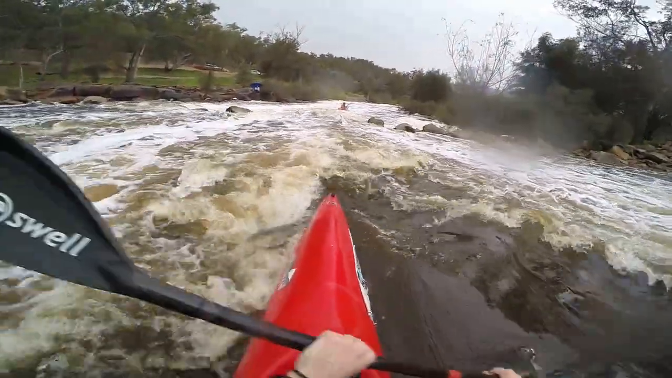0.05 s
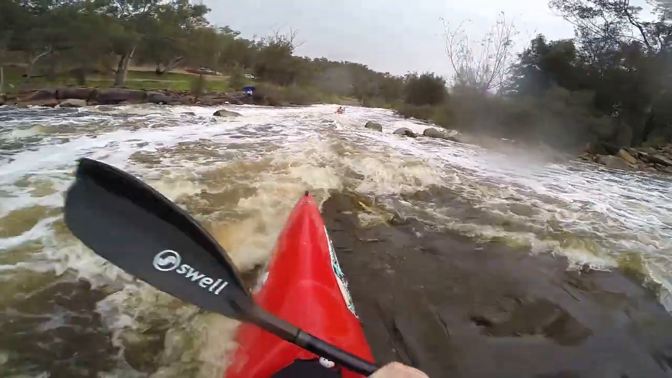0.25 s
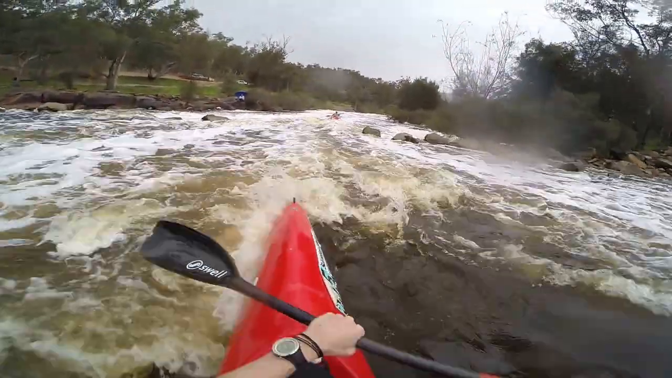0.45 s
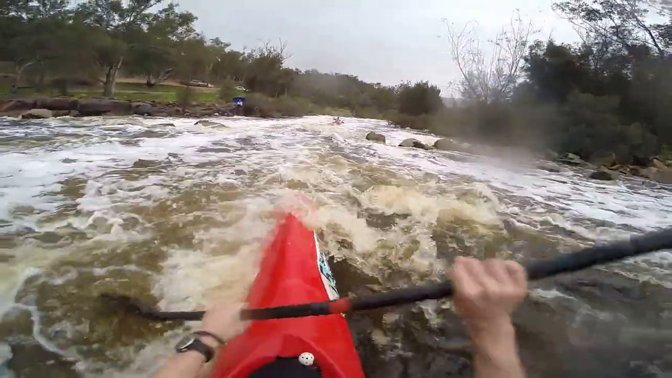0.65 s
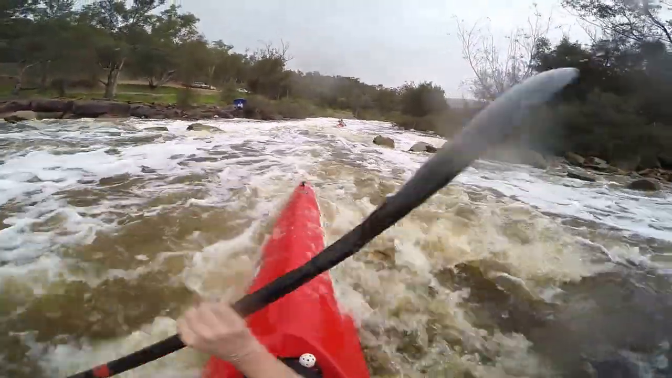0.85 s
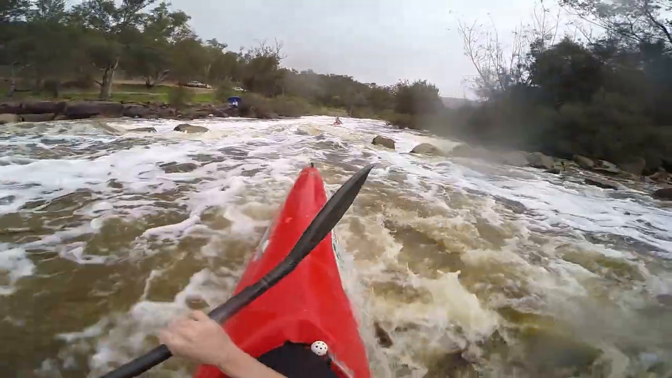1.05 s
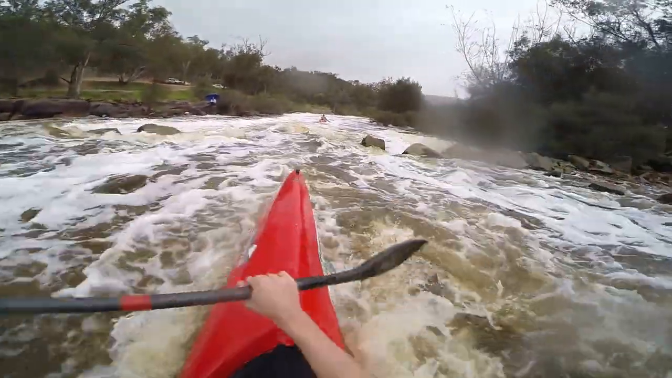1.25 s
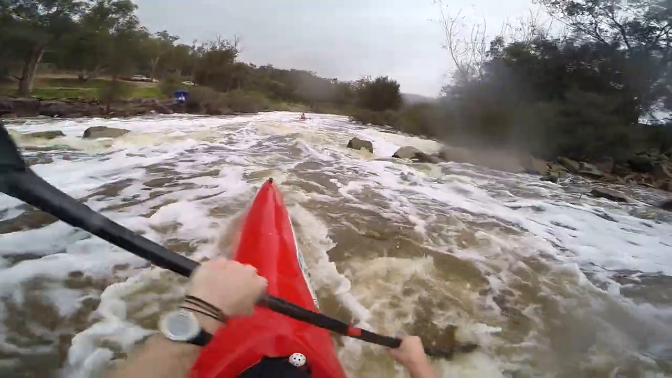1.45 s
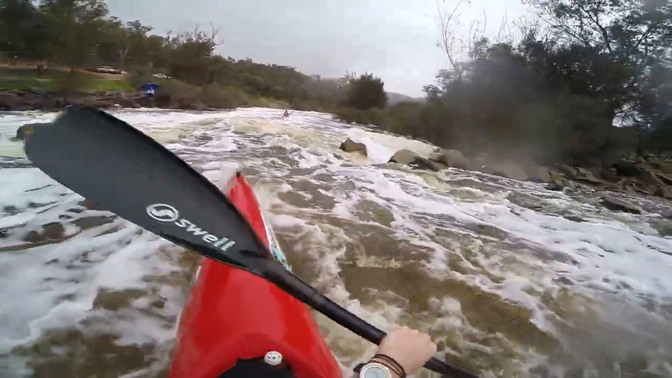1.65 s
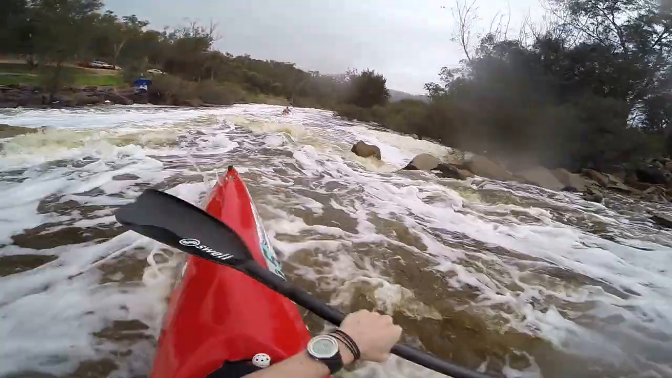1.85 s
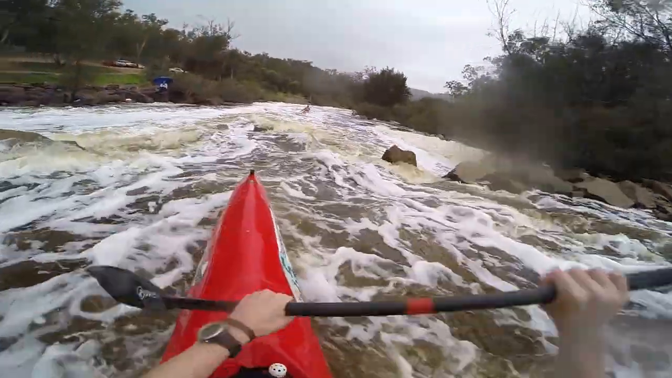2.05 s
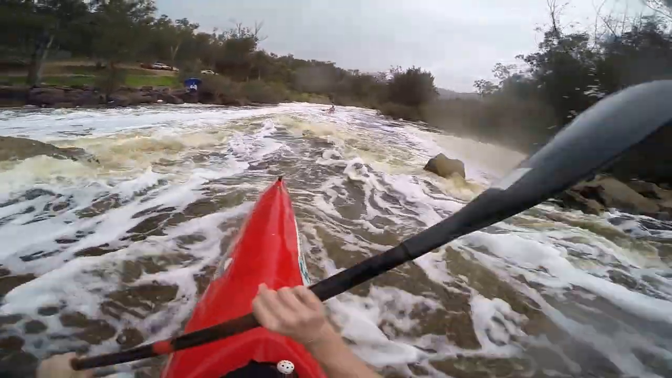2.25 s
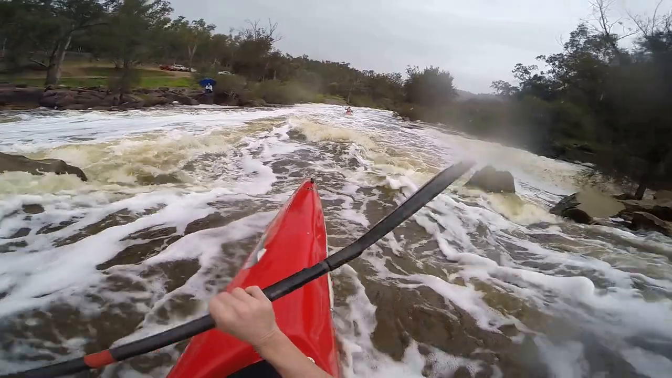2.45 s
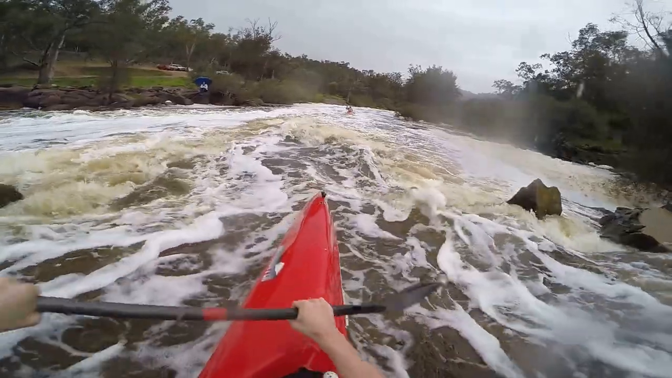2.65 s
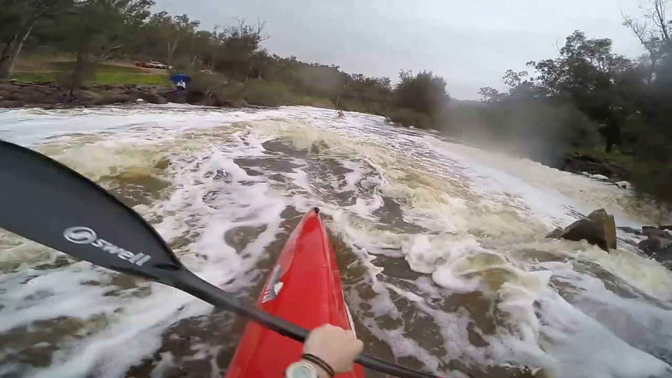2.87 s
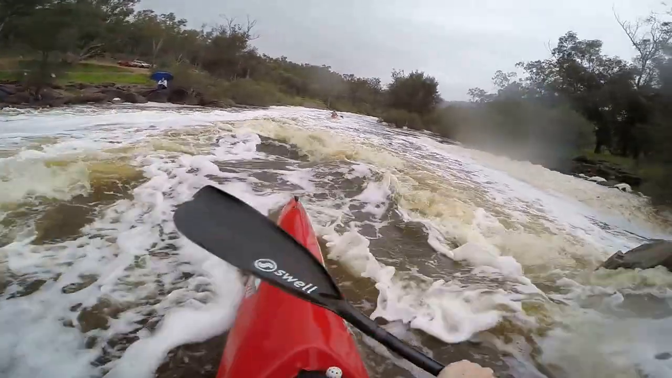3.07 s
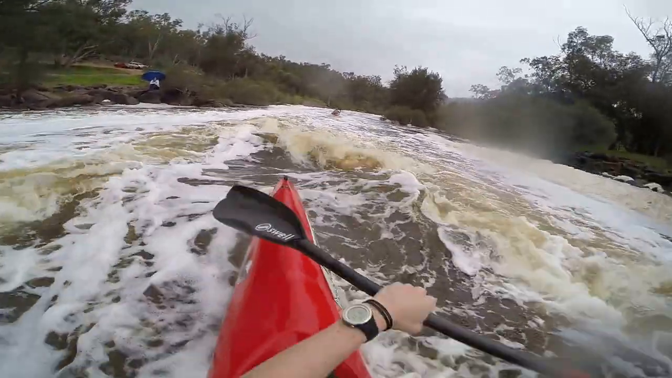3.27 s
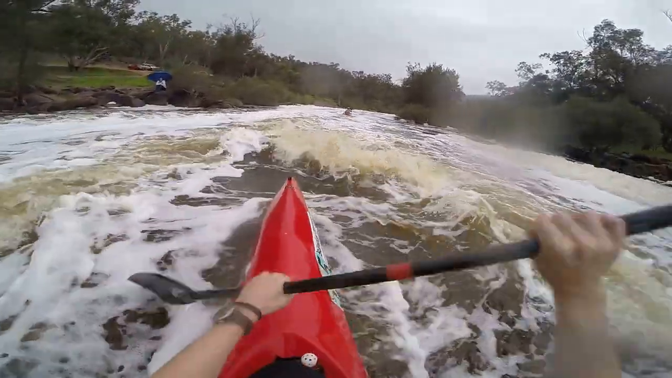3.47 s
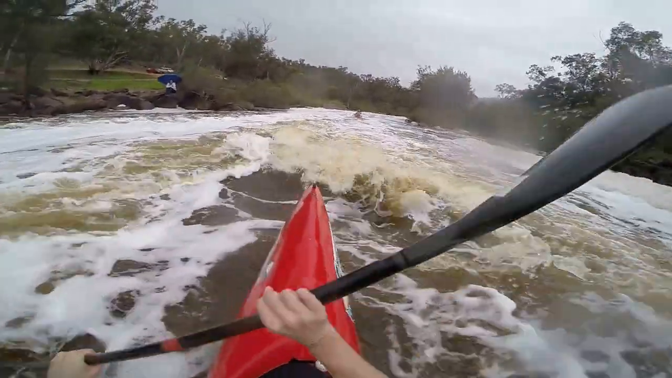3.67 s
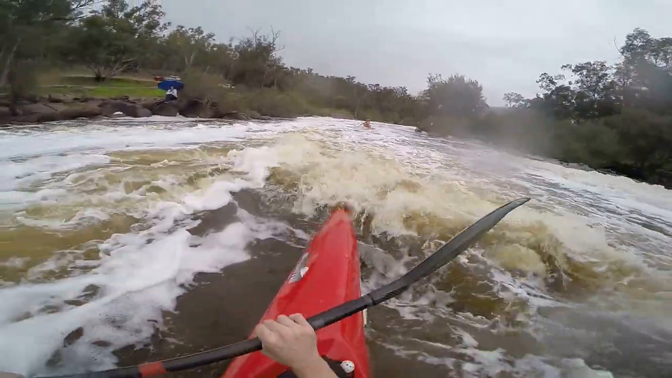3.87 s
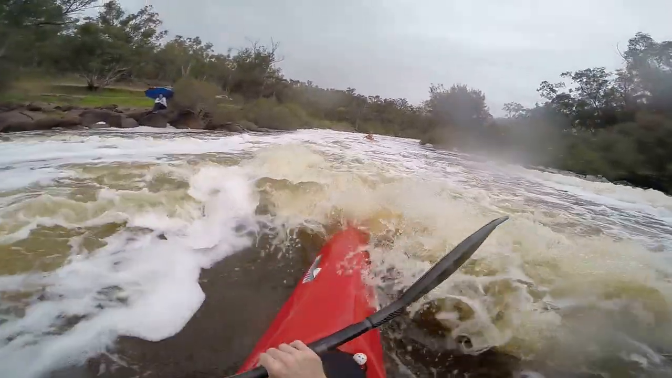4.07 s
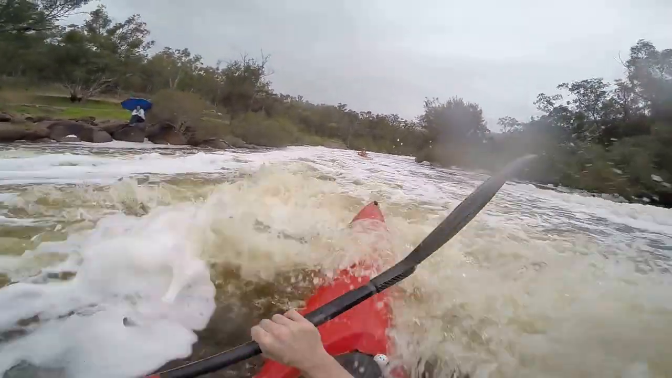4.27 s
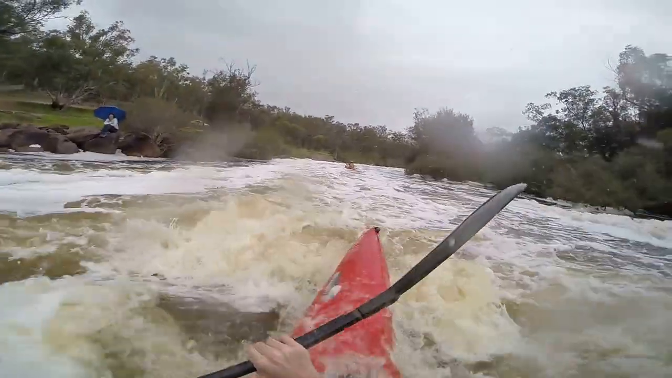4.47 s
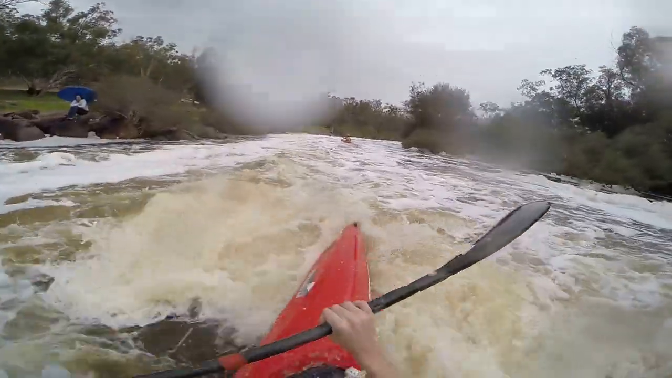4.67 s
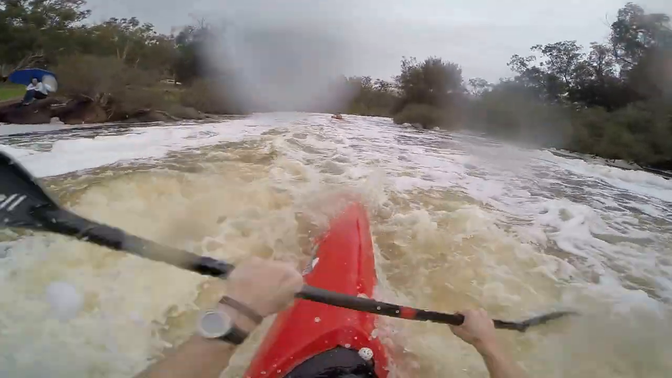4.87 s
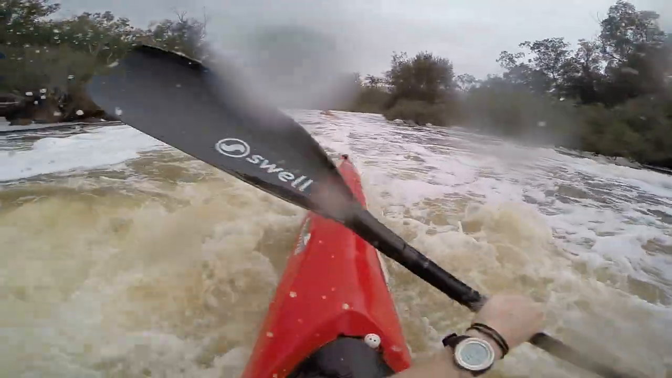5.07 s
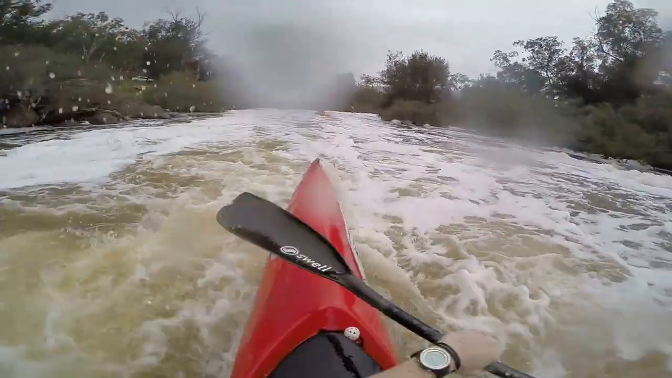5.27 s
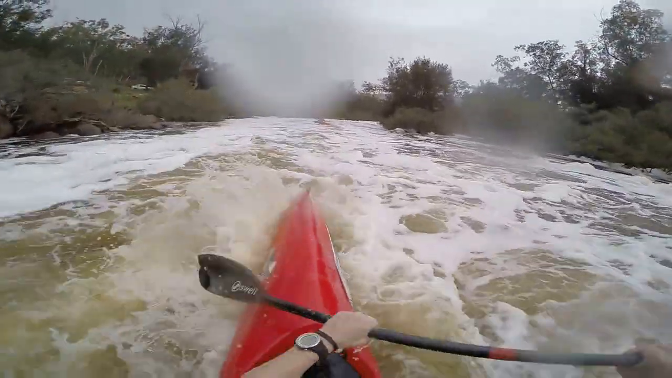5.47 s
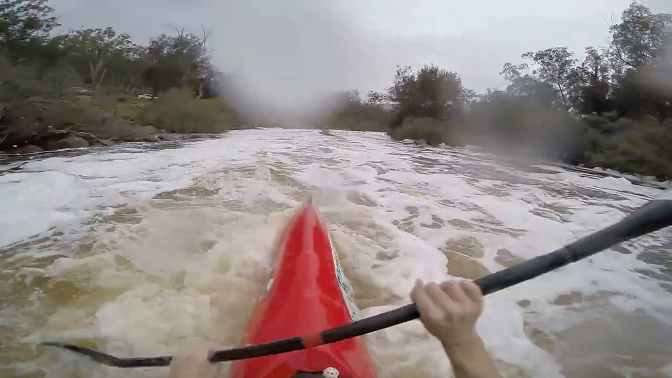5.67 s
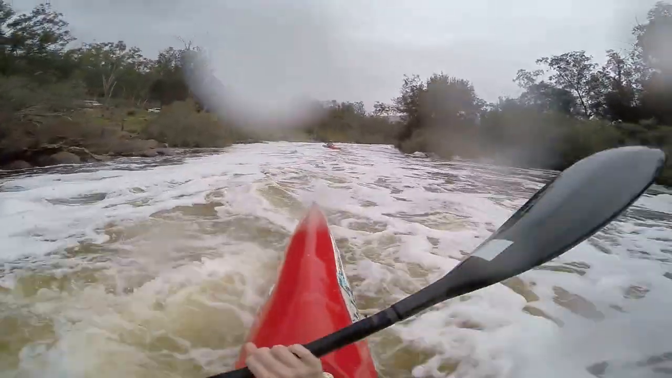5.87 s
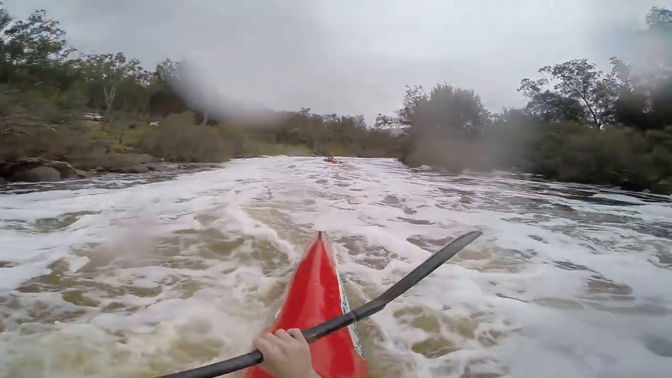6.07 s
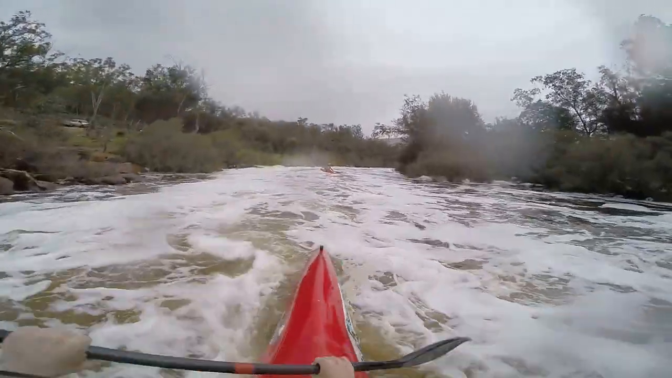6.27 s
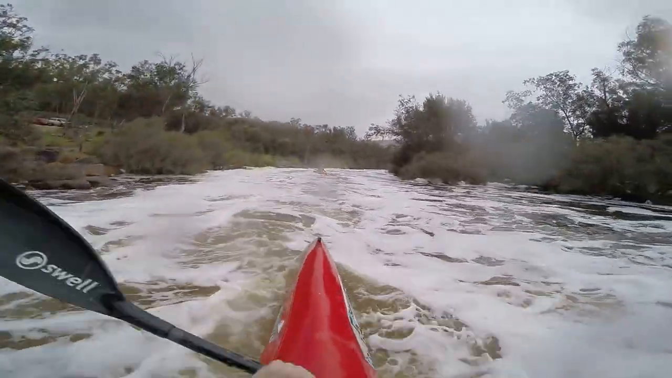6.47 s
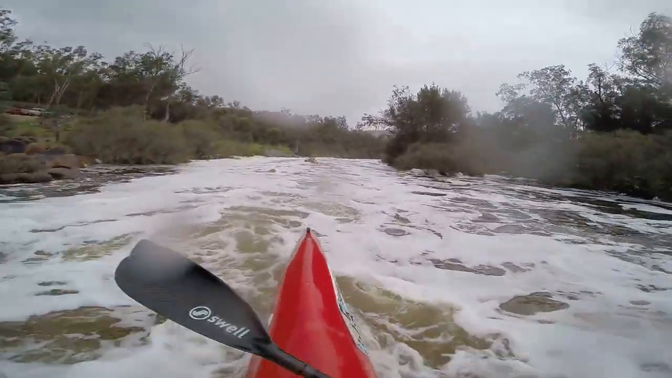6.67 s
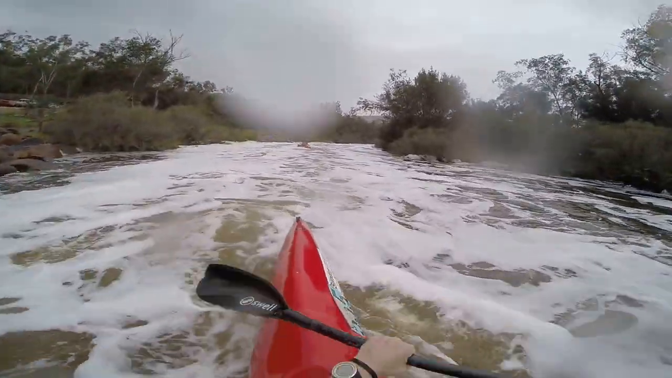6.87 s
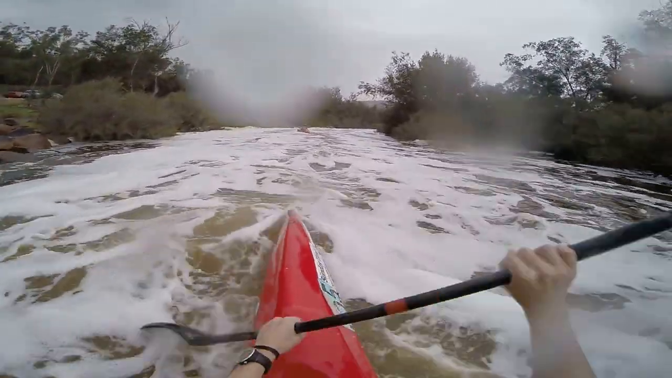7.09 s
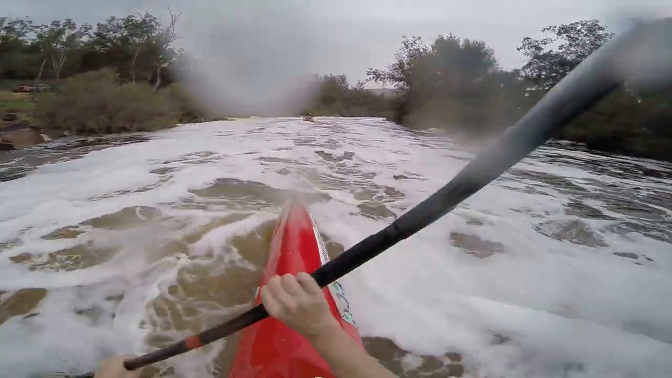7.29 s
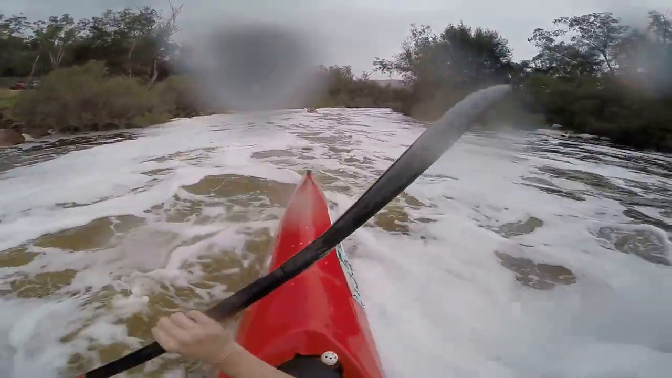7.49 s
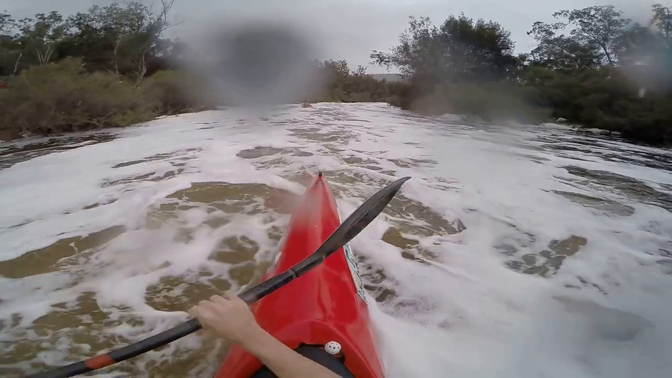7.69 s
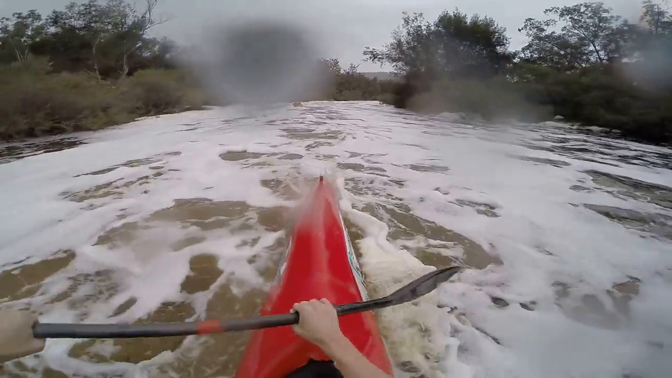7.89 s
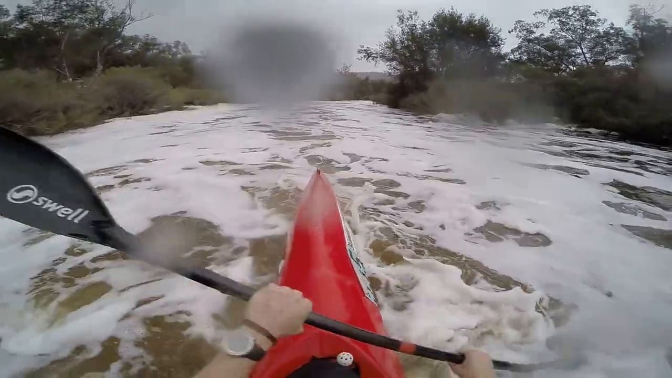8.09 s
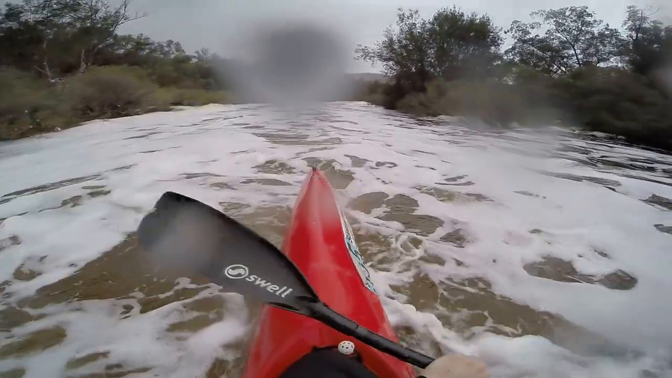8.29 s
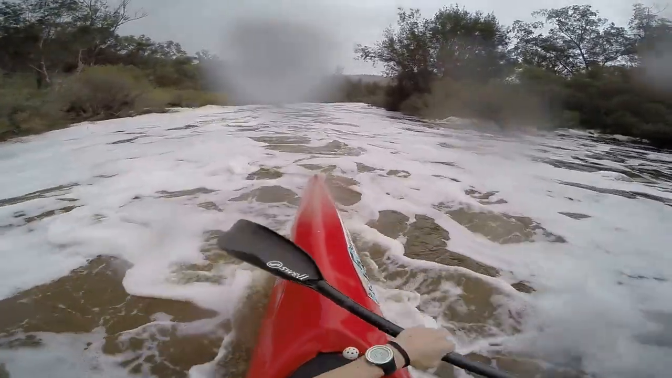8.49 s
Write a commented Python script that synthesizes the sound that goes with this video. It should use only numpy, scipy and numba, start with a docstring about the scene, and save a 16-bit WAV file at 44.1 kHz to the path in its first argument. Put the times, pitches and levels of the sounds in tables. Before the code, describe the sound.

Heard from a paddler's body through a hollow, resonant waterproof case, a kayak drops through whitewater. From 0 s the water is loud and rough, a dense bubbling rush with hissing spray; a slap of splash and a low buffet come near 0.75 s, and smaller splashes with a paddle swish around 1.5 s. It eases by 2.1 s, then low roar and gusts build from 2.8 s, with two ticks at 3.25 s. Splashes from 4.1 s lead to the loudest burst at 4.4-4.7 s: crashing water, fine patter and hard drop taps. Around 5.0-5.4 s come a strong swish, spray, two sharp clicks and deep hull gulps. From 5.6 s the rush falls away, with a clear tap at 6.4 s, soft blade swishes around 6.6 and 7.3 s, a tiny wet squeak at 7.5 s, faint ticks, and quiet foam until a final tap at 8.5 s.

```python
"""On a whitewater rapid a kayak runs the waves, heard by a microphone in a waterproof case worn by the paddler.
Clouds of ringing bubbles over a noise wash make the churn, splash, spray and paddle swish, all through the case.
Low noise buffets and roars, sagging sines gulp and thump the hull, and a narrow band of noise squeaks.
Flung drops tap the case and ring its walls; finer droplets patter as a cloud of very short rings."""
import sys
import numpy as np
from scipy import signal
from scipy.fft import rfft, irfft, next_fast_len
from scipy.io import wavfile
from numba import njit

SR = 44100
rng = np.random.default_rng(int(sys.argv[2]) if len(sys.argv) > 2 else 0)


def int16_out(signal):
    """Quantize to a 16-bit WAV file."""
    q = np.round(np.clip(np.atleast_2d(signal).T, -1, 1) * 32767)
    wavfile.write(sys.argv[1], SR, q.astype(np.int16))


N = 376613
TIME = np.arange(N) / SR


def undb(db):
    """Decibels to gain."""
    return 10 ** (np.asarray(db) / 20)


def unit(x):
    """Scale to rms 1."""
    return x / np.sqrt(np.mean(x ** 2))


def walk(rate):
    """Random levels, `rate` a second, joined by straight lines; spread near 1."""
    knots = rng.standard_normal(4096)
    line = np.interp(TIME * rate, np.arange(len(knots)), knots)
    return line * np.sqrt(3 / 2)  # makes up for the spread lost between knots


def colour(x, points):
    """Filter a sound along a spectrum curve, straight between its points on a log frequency axis."""
    size = next_fast_len(len(x))
    hz, db = np.transpose(points)
    bin_hz = np.arange(size // 2 + 1) * SR / size
    gain = undb(np.interp(np.log(bin_hz + 1), np.log(hz), db))
    return irfft(rfft(x, size) * gain, size)[:len(x)]


def add(out, s, sound):
    """Mix a sound in at time s."""
    start = int(s * SR)
    out[start:start + len(sound)] += sound[:max(N - start, 0)]


def swells(table, skew=1):
    """Half-sine gain for each (t/s, length/s, level/dB) row; a skew under 1 rises faster than it dies."""
    out = np.zeros(N)
    for s, length, db in table:
        age = np.linspace(0, 1, int(length * SR))
        add(out, s, undb(db) * np.sin(np.pi * age ** skew))
    return out


def with_turbulence(db, growth):
    """Gain of a layer: db in usual water, plus `growth` dB for each dB the water gets rougher."""
    # how hard the water breaks around the boat, through two drops and out into the foam below:
    # [t/s, roughness/dB]
    roughness = [(0.0, -38), (1.0, -37.5), (1.47, -40.5), (1.62, -42), (2.09, -46.5), (2.95, -43.5),
                 (3.3, -40.5), (4.52, -36.5), (5.28, -39), (5.56, -44.5), (5.94, -47), (6.23, -51),
                 (7.02, -55), (7.54, -52), (7.8, -56), (8.54, -57)]
    usual_db = -44
    s, rough_db = np.transpose(roughness)
    return undb(db + growth * (np.interp(TIME, s, rough_db) - usual_db))


def case_response(size=2048):
    """Minimum-phase impulse response of the case: its wall and air resonances as bumps in the spectrum."""
    # resonances and one dip of the waterproof case: [centre f/Hz, width at half the dB height/Hz, level/dB]
    resonances = [(708, 116, 3), (1267, 130, 2.5), (1651, 610, 7), (2538, 690, 10.5), (2980, 125, -4.5),
                  (3377, 110, 4), (4700, 310, 4), (5775, 240, 5), (6900, 890, 2.5), (10420, 400, 3),
                  (12380, 1000, 3)]
    hz = np.arange(size // 2 + 1) * SR / size
    db = sum(peak * .5 ** ((2 * (hz - centre) / width) ** 2) for centre, width, peak in resonances)
    # folding the cepstrum onto positive time makes the response causal
    cepstrum = irfft(np.log(undb(db)))
    cepstrum[1:size // 2] *= 2
    cepstrum[size // 2 + 1:] = 0
    return irfft(np.exp(rfft(cepstrum)))


def in_case(x):
    """A sound as it arrives inside the case, hollowed by the resonances."""
    return signal.oaconvolve(x, case_response())[:len(x)]


@njit
def ring_bubbles(starts, hz, cycles, sizes, rise):
    """Each bubble is a fading sine whose pitch rises as it nears the surface."""
    out = np.zeros(N)
    for k in range(len(starts)):
        length = int(cycles[k] * SR / hz[k]) + 2
        z = sizes[k] + 0j
        step = np.exp(2j * np.pi * hz[k] / SR - 6 / length)  # turns the phase and fades
        glide = np.exp(2j * np.pi * hz[k] / SR * rise / length)  # speeds the turning
        for i in range(starts[k], min(N, starts[k] + length)):
            out[i] += z.imag
            z *= step
            step *= glide
    return out


def bubbles(low_hz, high_hz, cycles, spread_db, count):
    """A cloud of bubbles at random times and pitches, most faint and a few close; `cycles` is a mean life."""
    when, pitch, life, size = rng.random((count, 4)).T
    starts = (when * N).astype(np.int64)
    hz = low_hz * (high_hz / low_hz) ** pitch
    nearness = -np.log(1 - size * .995)
    sizes = undb(spread_db * nearness) * hz  # small ones are brief, so they peak higher for the same hiss
    return unit(ring_bubbles(starts, hz, cycles * (.5 + life), sizes, 0.18))


def whitewater(cloud, spectrum, wash_db, flicker_db, flicker_rate):
    """Near bubbles over the smooth noise wash of countless far ones, tumbling unevenly."""
    water = cloud + undb(wash_db) * rng.standard_normal(N)
    cased = in_case(colour(water, spectrum))
    return unit(cased * undb(flicker_db * walk(flicker_rate)))


def buffeting():
    """Eddies press on the case in breeze and gusts, over the river's low roar that swells at the big wave."""
    # relative spectra of the eddies and of the roar: [f/Hz, level/dB]
    eddy_spectrum = [(8, 0.5), (20, 7.5), (42, -8.5), (62, -2.5), (90, -10.5), (130, -17.5), (190, -20),
                     (400, -44), (1000, -55)]
    roar_spectrum = [(30, -1), (75, 6), (150, -0.5), (200, -0.5), (260, -13), (500, -17), (1200, -40.5)]
    # gusts on the case as the boat pitches over a wave: [t/s, length/s, level/dB]
    gusts = [(0.72, 0.32, -34.5), (0.95, 0.33, -39), (1.6, 0.27, -43), (2.82, 0.5, -31),
             (3.68, 0.12, -33.5), (4.14, 0.9, -28.5), (5.0, 0.55, -31.5), (5.82, 0.24, -41),
             (7.3, 0.39, -42.5)]
    # the big standing wave roars as the boat nears and crosses it: (t/s, length/s, level/dB)
    wave_roar = (2.7, 2.3, -46.5)
    eddies = unit(colour(rng.standard_normal(N), eddy_spectrum) * undb(1.05 * walk(14)))
    roar = unit(colour(rng.standard_normal(N), roar_spectrum))
    breeze = with_turbulence(db=-45.5, growth=0.19)
    wind = np.hypot(breeze, swells(gusts, skew=0.72))
    return eddies * wind + roar * np.hypot(undb(-50), swells([wave_roar]))


def squeak(centre_hz=3450, width_hz=260):
    """A narrow band of hiss that swells and fades."""
    # a thin wet squeak at the end of a stroke: (t/s, length/s, level/dB)
    stroke_end = (7.51, 0.06, -49)
    edges = [centre_hz - width_hz / 2, centre_hz + width_hz / 2]
    band = signal.butter(2, edges, "band", fs=SR, output="sos")
    hiss = unit(signal.sosfilt(band, rng.standard_normal(N)))
    return hiss * swells([stroke_end])


def patter():
    """Tiny droplets rain on the case as the bow bursts through the wave: a cloud of very short rings."""
    # a burst of fine droplets thrown up by the bow: (t/s, length/s, level/dB)
    burst = (4.42, 0.21, -49)
    ticks = unit(in_case(bubbles(3500, 11000, cycles=5, spread_db=4, count=1500)))
    return ticks * swells([burst])


def drops(tick_db=-7, spatter_db=-27, spatter_t60=0.014, size=2048):
    """A drop ticks on the case, rings two wall modes where it lands and scatters in a brief spatter."""
    # drops tapping the case:
    # [t/s, peak level/dB, low ring f/Hz, high ring f/Hz, high ring level over low before filtering/dB]
    taps = [(0.7675, -20, 2360, 3200, 3), (1.3437, -22.5, 796, 2200, 6), (2.3240, -24.5, 2730, 6160, 8),
            (3.2560, -17.5, 2130, 2690, -4), (3.2575, -18.5, 1140, 2200, -2),
            (4.1622, -19.5, 1770, 3400, 8), (4.3960, -8, 2830, 6160, 16), (4.4868, -17, 2100, 5500, -2),
            (4.4902, -16, 2400, 4600, 7), (4.5872, -13.5, 4400, 5970, -11), (5.1612, -30, 327, 690, 2),
            (5.1620, -10, 1580, 7700, 10), (5.1636, -8, 9400, 11600, 4), (5.9015, -31, 3660, 6500, 4),
            (5.9695, -30, 1294, 2400, -2), (6.38, -29.5, 6530, 9050, 11), (6.3798, -19, 1620, 2380, 12),
            (7.062, -32, 1900, 3300, 9), (7.6512, -28.5, 1465, 2170, 2), (7.6617, -31.5, 1255, 2170, 0),
            (7.7080, -37, 2710, 3400, -8), (7.7476, -29, 724, 2460, -3.5), (7.7800, -41, 523, 1500, -10),
            (7.8680, -34, 6200, 9000, 0), (8.0338, -27.5, 2980, 7760, 9), (8.4926, -16.5, 2920, 6000, 6.5)]
    low_ring_cycles, high_ring_cycles = 15.7, 10.2  # a wall mode dies by 60 dB in this many cycles
    out, t = np.zeros(N), np.arange(size) / SR
    softness = signal.butter(2, 12000, fs=SR)  # water is a soft hammer
    for s, db, low_hz, high_hz, high_db in taps:
        low_t60, high_t60 = low_ring_cycles / low_hz, high_ring_cycles / high_hz
        low = np.sin(2 * np.pi * low_hz * t) * undb(-60 * t / low_t60)
        high = np.sin(2 * np.pi * high_hz * t) * undb(high_db - 60 * t / high_t60)
        click = signal.lfilter([1, -1], [1, -.85], np.exp(-t / .00006))
        tick = undb(tick_db + high_db) * click
        spatter = undb(spatter_db + high_db - 60 * t / spatter_t60) * rng.standard_normal(size)
        soft = signal.lfilter(*softness, low + high + tick + spatter)
        stiffness = signal.butter(2, low_hz * 0.38, "high", fs=SR)  # the wall hardly moves below its lowest mode
        tap = in_case(signal.lfilter(*stiffness, soft))
        add(out, s, undb(db) * tap / np.abs(tap).max())
    return out


def gulps(sag=.81, rough=0.28, rough_rate=90):
    """Trapped air and the hollow hull boom briefly and unevenly, sagging to `sag` times the start pitch."""
    # hull thumps and air pockets gulping behind the blade:
    # [t/s, peak level before roughening/dB, start f/Hz, length/s]
    booms = [(0.797, -38, 130, .027), (2.903, -31, 91, .039), (4.858, -35, 90, 0.041),
             (4.984, -30.5, 98, 0.046), (5.122, -24, 113, 0.048), (5.163, -29, 123, 0.13),
             (5.248, -22.5, 128, 0.055), (5.348, -19, 105, 0.029), (5.901, -29.5, 89, 0.029),
             (7.326, -47, 760, .014), (7.385, -40, 145, 0.13), (7.778, -31.5, 117, 0.025)]
    out = np.zeros(N)
    for s, db, start_hz, length in booms:
        age = np.linspace(0, 1, int(length * SR))
        phase = 2 * np.pi * np.cumsum(start_hz * sag ** age) / SR
        swell = np.sin(np.pi * age ** 0.63) ** 2  # rises faster than it dies
        add(out, s, undb(db) * swell * np.sin(phase))
    return out * (1 + rough * walk(rough_rate))


def paddle():
    """The blade throws a sheet of fine bubbles that swells and fades."""
    # relative spectrum of the swish, ahead of the case: [f/Hz, level/dB]
    swish_spectrum = [(1200, -20), (2300, -9), (3000, -2.5), (3400, 3), (4300, 1), (5000, -8), (6500, -12),
                      (12000, -30)]
    # the blade slicing the foam: [t/s, length/s, level/dB]
    slices = [(1.5, 0.26, -47.5), (5.03, 0.31, -38), (6.53, 0.27, -50.5), (6.8, 0.46, -59),
              (7.19, 0.41, -48), (8.04, .16, -63)]
    cloud = bubbles(2100, 6640, cycles=18.0, spread_db=0.5, count=12000)
    fizz = whitewater(cloud, swish_spectrum, wash_db=6.0, flicker_db=1.5, flicker_rate=22)
    return fizz * swells(slices)


def rapid():
    """Big bubbles churn, middling ones splash and the finest fizz as spray, swelling with turbulence."""
    # relative spectra of the three layers, ahead of the case: [f/Hz, level/dB]
    churn_spectrum = [(70, 2.5), (120, 1), (190, -1.5), (280, 1), (500, -2), (900, -7.5), (1400, -24),
                      (3000, -47)]
    splash_spectrum = [(300, -3.5), (800, -3.5), (1300, 2), (2000, 2.5), (2800, -5), (4200, -3), (6000, -6),
                       (10000, -26.5)]
    spray_spectrum = [(1500, -5.5), (3200, 0), (4500, 3), (6300, -2.5), (7700, -12), (9500, -10.5),
                      (11000, -20), (14000, -25), (15500, -61)]
    # waves collapsing on the bow: [t/s, length/s, splash level/dB, deep churn level/dB]
    breakers = [(0.74, .14, -40, -50), (1.098, 0.22, -51, -56), (1.496, .14, -44, -58),
                (1.74, 0.17, -48, -63), (3.0, 0.92, -49, -53.5), (4.082, 0.12, -40, -43),
                (4.286, 0.17, -49, -48), (4.532, 0.19, -34, -45.5)]
    # sheets of spray flung by bow and blade: [t/s, length/s, level/dB]
    sheets = [(0.07, 0.68, -45), (1.16, 0.12, -44), (1.49, 0.11, -41), (4.46, 0.14, -35.5),
              (4.88, 0.4, -39), (5.71, 0.093, -45.5), (5.94, .16, -50.5)]

    big = bubbles(219.5, 1310, cycles=16.2, spread_db=1, count=3500)
    middling = bubbles(899.3, 5110, cycles=31.0, spread_db=2.0, count=16000)
    fine = bubbles(3110, 13500, cycles=20, spread_db=3.5, count=20000)
    churn = whitewater(big, churn_spectrum, wash_db=7.0, flicker_db=-1.5, flicker_rate=32)
    splash = whitewater(middling, splash_spectrum, wash_db=6.5, flicker_db=0.59, flicker_rate=20)
    spray = whitewater(fine, spray_spectrum, wash_db=4.5, flicker_db=1.23, flicker_rate=30)

    breaking_splash = swells([(s, length, db) for s, length, db, _ in breakers])
    breaking_churn = swells([(s, length, db) for s, length, _, db in breakers])
    # hypot adds the powers of steady water and single events
    churn_gain = np.hypot(with_turbulence(db=-52, growth=0.71), breaking_churn)
    splash_gain = np.hypot(with_turbulence(db=-43.5, growth=0.96), breaking_splash)
    spray_gain = np.hypot(with_turbulence(db=-49, growth=0.97), swells(sheets))
    surge = undb(0.16 * walk(14))  # splash and spray waver together
    return churn * churn_gain + surge * (splash * splash_gain + spray * spray_gain)


def scene():
    """The river, the boat and the paddle at one microphone."""
    surroundings = buffeting() + squeak() + patter() + drops()
    return (surroundings + gulps() + paddle() + rapid())[None]


def record(dry):
    """A steep low-pass cuts the top of the treble, above 15.5 kHz."""
    return signal.sosfilt(signal.ellip(10, .2, 70, 15500, fs=SR, output="sos"), dry)


dry = scene()
out = record(dry)
int16_out(out)
```